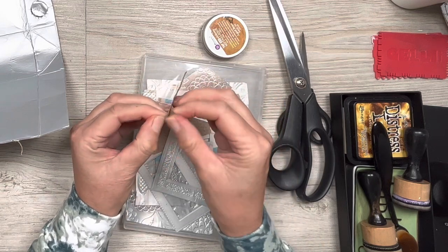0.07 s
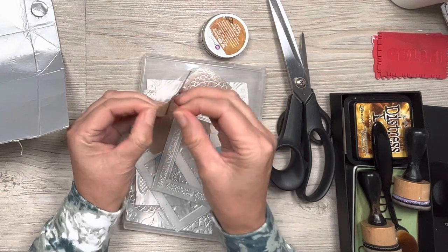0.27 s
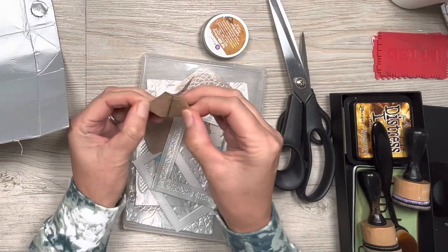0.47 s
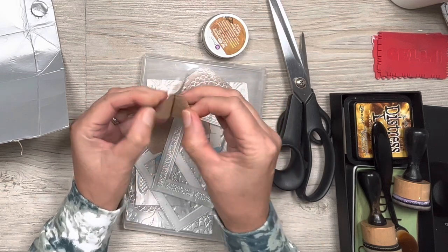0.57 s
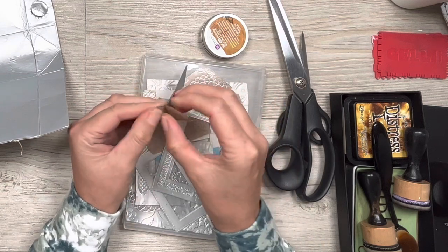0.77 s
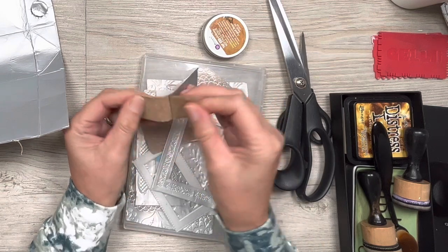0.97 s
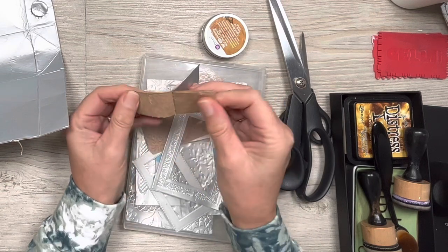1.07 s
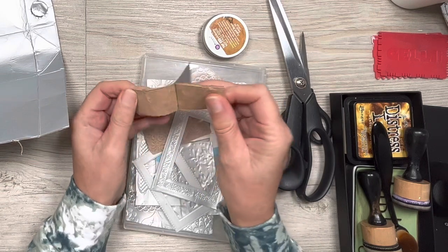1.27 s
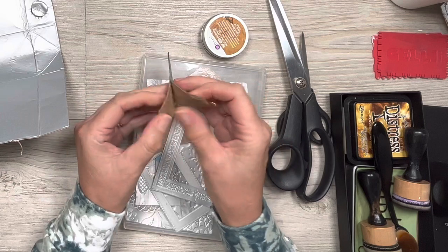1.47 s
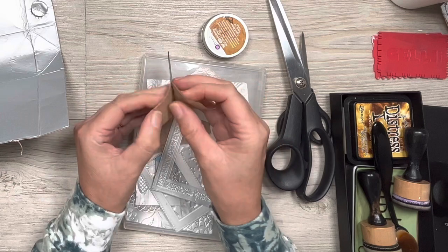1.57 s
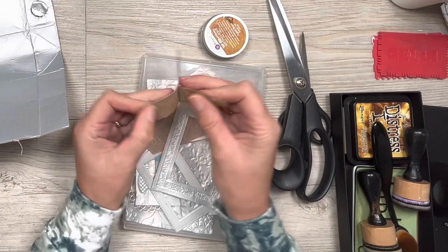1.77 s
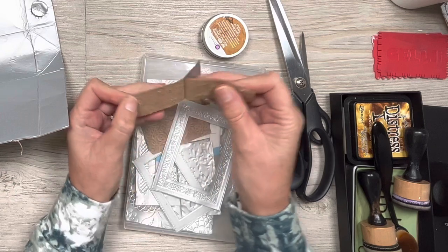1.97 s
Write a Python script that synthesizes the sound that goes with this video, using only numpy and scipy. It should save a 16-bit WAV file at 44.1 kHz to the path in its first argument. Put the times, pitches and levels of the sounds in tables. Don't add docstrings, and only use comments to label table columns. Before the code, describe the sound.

Hands peel a small piece of cardboard apart in three short, crackling rips, with faint finger scuffs and ticks between; a quiet small room with low rumble, heard close on a phone's stereo microphones.

```python
import sys
import numpy as np
from scipy import signal
from scipy.fft import rfft, irfft
from scipy.io import wavfile
from scipy.ndimage import uniform_filter1d

SR = 44100
rng = np.random.default_rng(int(sys.argv[2]) if len(sys.argv) > 2 else 0)


def convert_level_to_amplitude(level_db):
    exponent = np.asarray(level_db, float) / 20
    return 10 ** exponent


def transcribe(u):
    v = np.clip(np.atleast_2d(u).T, -1, 1)
    q = np.round(v * 32767).astype(np.int16)
    wavfile.write(sys.argv[1], SR, q)


N = 88861

# (time [s], pull [dB], flap resonance [dB], brightness [dB])
RIPS = [
    [(0.145, -66, 21, -3), (0.149, -60, -52, -6.5), (0.181, -49.5, -33, -1), (0.225, -46.5, -19, 3),
     (0.363, -40, -19.5, -1.5), (0.433, -60.5, -17, -6), (0.46, -60.5, 12, -22)],
    [(0.845, -61, -11, -2), (0.859, -48, -70, 3.5), (0.875, -46, -21, 0), (0.915, -36.5, -42, -1.5),
     (0.999, -42.5, -5.5, 0.5), (1.095, -51, -18, -1), (1.113, -47, -5.5, 2), (1.173, -45.5, -12.5, 1.5),
     (1.25, -79, -17, -1)],
    [(1.735, -68, -11, 0), (1.763, -60.5, -11.5, -1), (1.775, -48, -29, 2), (1.829, -45, -27.5, -5),
     (1.937, -38, -13.5, 2), (1.957, -44, -4, 6.5), (1.969, -48.5, -10.5, 7.5), (2.015, -54.5, -19, 8)],
]
# (frequency [Hz], level [dB])
FIBRE_COLOUR = [(300, -24.5), (700, -20.5), (1400, -11), (3000, -7), (5500, 0.5), (8500, -1), (12000, 2),
                (15400, 1)]
FLAP_TOP_DB, FLAP_PULL_DB = -4, -50


def rips():
    t = np.arange(N) / SR
    snaps = fibres(per_s=5700, spread_db=1.5, clump_db=0.95, hiss=0.53)
    tear = evened(card(snaps, FIBRE_COLOUR, ring_db=-7.5))
    flap = loose_flap(snaps, hz=893, width_hz=233)
    out = 0
    for rip in RIPS:
        s, pull_db, flap_db, bright_db = np.transpose(rip)
        level = convert_level_to_amplitude(np.interp(t, s, pull_db, -150, -150) + 4.5)
        flap_limit_db = FLAP_TOP_DB + (np.interp(t, s, pull_db) - FLAP_PULL_DB) / 2
        shake = convert_level_to_amplitude(np.minimum(np.interp(t, s, flap_db), flap_limit_db) - 4.5)
        out = out + level * (tilt(tear, np.interp(t, s, bright_db)) + shake * flap)
    return out


# (time [s], level [dB])
GRIP = [(0, -68.5), (.13, -89), (.3, -67), (.5, -75), (.58, -70), (.7, -68), (.77, -68.5), (.84, -65.5),
        (1.27, -75.5), (1.32, -70.5), (1.37, -68), (1.44, -66), (1.53, -73), (1.58, -67), (1.67, -74),
        (1.72, -72.5), (1.76, -60), (2.02, -74)]
# (start [s], length [s], level [dB], brightness [dB], flap resonance [dB])
SCUFFS = [(0.028, 0.017, -64, -2.5, -61), (0.077, 0.045, -77, -21, -7), (0.514, 0.038, -58, -2, -11),
          (0.641, 0.017, -67, -3.5, -22), (0.774, 0.037, -63.5, 3, -13), (1.291, 0.0045, -84.5, 14, -48),
          (1.334, 0.018, -61, -7, -20), (1.37, 0.0098, -71, 3, -31), (1.386, 0.013, -60, 3, -22),
          (1.407, 0.0048, -73, 9, -7), (1.487, 0.0092, -74, -10, -8.5), (1.556, 0.018, -80.5, 10, -12),
          (1.631, 0.025, -83, 15, -42), (1.66, 0.023, -86.5, 10, -11)]
SCUFF_RISE, SCUFF_RELEASE_S = 0.34, 0.005
# (time [s], peak level [dB], brightness [dB])
SNAPS = [(0.527, -41, 1), (.8575, -38.5, 8), (1.1075, -30.5, 20), (1.2955, -78, 1), (1.337, -45.5, -11),
         (1.503, -54, -39), (1.781, -42, 6), (.169, -43, 9), (1.8767, -28.5, -3.5), (1.961, -34, 3),
         (1.241, -51, -14)]
# (frequency [Hz], level [dB])
SKIN_COLOUR = [(300, -24), (1000, -16.5), (1700, -3.5), (4400, -5.5), (6500, -1), (8000, -6.5), (11000, -6),
               (15000, -10.5)]


def fingers():
    t = np.arange(N) / SR
    grains = fibres(per_s=4000, spread_db=2.5, clump_db=0.8, hiss=1.5)
    rub = evened(card(grains, SKIN_COLOUR, ring_db=1))
    flap = loose_flap(grains, hz=900, width_hz=400)
    out = convert_level_to_amplitude(np.interp(t, *np.transpose(GRIP)) + 2) * (rub + convert_level_to_amplitude(-17.5) * flap)
    for start, length, db, bright_db, flap_db in SCUFFS:
        rise = np.clip((t - start) / (SCUFF_RISE * length), 0, 1)
        shape = rise * np.exp(-np.maximum(t - start - length, 0) / SCUFF_RELEASE_S)
        out = out + convert_level_to_amplitude(db + 4.5) * shape * (tilt(rub, bright_db) + convert_level_to_amplitude(flap_db) * flap)
    for s, db, bright_db in SNAPS:
        out = out + convert_level_to_amplitude(db) * snap(t - s, bright_db)
    return out


def snap(since, bright_db):
    burst = rng.standard_normal(N) * (since >= 0) * np.exp(-np.maximum(since, 0) / 0.0012)
    tick = tilt(signal.oaconvolve(burst, colour(SKIN_COLOUR))[:N], bright_db)
    tick = tick + convert_level_to_amplitude(-4) * ring(burst, SHEET_MODES[:3] + SHEET_MODES[5:6])
    tick = tick + convert_level_to_amplitude(-10) * ring(burst, FLAP_MODES[:3])
    return tick / abs(tick).max()


def fibres(per_s, spread_db, clump_db, hiss):
    draw, fine = rng.random(N), rng.standard_normal(N)
    size = np.minimum(rng.exponential(1, N), 4)
    snaps = convert_level_to_amplitude(spread_db * size) * np.sign(fine) * (draw < per_s / SR)
    clumps = convert_level_to_amplitude(clump_db * (drift(size=60) + drift(size=400)))
    return evened((evened(snaps) + hiss * fine) * clumps)


# (frequency [Hz], width [Hz], level [dB])
SHEET_MODES = [(2315, 79, -28.5), (2997, 170, 0.5), (4417, 540, 2), (5630, 710, 4), (6195, 74, 5),
               (7050, 164, -0.5), (9760, 100, -15.5), (14430, 390, 7)]


def card(x, spectrum, ring_db):
    body = signal.oaconvolve(x, colour(spectrum))[:N]
    rings = sum(convert_level_to_amplitude(2.64 * drift(size=1500)) * ring(body, [mode]) for mode in SHEET_MODES)
    return body + convert_level_to_amplitude(ring_db) * rings


# (frequency [Hz], width [Hz], level [dB])
FLAP_MODES = [(757, 173, -7.5), (956, 300, -0.5), (1178, 145, 3.5), (435, 113, 4)]


def loose_flap(x, hz, width_hz):
    return evened(ring(ring(x, FLAP_MODES), [(hz, width_hz, 0)]))


# (frequency [Hz], T60 [s])
ROOM_DECAY = [(500, 0.24), (3000, 0.15), (8000, 0.081), (15000, .12)]


def room(x, wet_db):
    taps = np.zeros(SR // 2)
    at = np.arange(20, len(taps) - 20, 20)
    taps[at + rng.integers(0, 20, len(at))] = rng.choice([-1., 1.], len(at))
    hz, t, z = signal.stft(taps, SR, nperseg=256)
    t60 = np.interp(hz, *np.transpose(ROOM_DECAY))[:, None]
    tail = signal.istft(z * convert_level_to_amplitude(-60 * t / t60), SR, nperseg=256)[1]
    return x + convert_level_to_amplitude(wet_db) * signal.fftconvolve(x, tail / np.linalg.norm(tail))[:N]


# (frequency [Hz], level [dB])
RUMBLE_COLOUR = [(25, -24), (57, 0), (85, -9), (190, -19), (330, -21), (650, -31), (1850, -31), (3250, -44)]
# (start [s], length [s], level [dB], pitch [Hz])
BUMPS = [
    (0.133, 0.12, -81, 54.5),
    (1.712, 0.031, -76, 155),
    (1.897, 0.12, -66.5, 130),
]


def rumble():
    hz, t = np.fft.rfftfreq(N, 1 / SR), np.arange(N) / SR
    f, db = np.transpose(RUMBLE_COLOUR)
    gain = convert_level_to_amplitude(np.interp(np.log(hz + 1), np.log(f), db, -60, -60))
    out = convert_level_to_amplitude(-76) * evened(irfft(rfft(rng.standard_normal(N)) * gain, N))
    for s, length, db, pitch in BUMPS:
        low = ring(ring(rng.standard_normal(N), [(pitch, pitch, 0)]), [(pitch, 2 * pitch, 0)])
        out = out + convert_level_to_amplitude(db) * evened(low) * np.sin(np.pi * np.clip((t - s) / length, 0, 1))
    return out


# (frequency [Hz], lag of the right [half turns], likeness [0-1], left over right [dB])
PORTS = [(40, 0, .97, 0), (130, 0, .5, 1), (350, -.7, .5, 4), (600, .1, .65, 3), (1200, -.25, .7, 2),
         (3200, .8, .3, -1), (4600, .6, .15, -4), (5450, 1, .92, 0), (7850, 2, .8, 0), (15150, 5, .87, 0)]
WANDER_TURNS = 0.07
PATCH_DB = 2.2


def two_ports(near, other):
    hz, _, (a, b) = signal.stft([near, other], SR, nperseg=512, noverlap=384)
    port_hz, *columns = np.transpose(PORTS)
    lag, like, pan_db = (np.interp(hz, port_hz, v)[:, None] for v in columns)
    treble = np.minimum(hz / 2000, 1)[:, None]
    wander = WANDER_TURNS * treble * drift_map(a.shape, frames=16, bins=24)
    patch = convert_level_to_amplitude(PATCH_DB * treble * drift_map(a.shape, frames=14, bins=9))
    a, b = a * patch, b * patch
    right = (like * a + np.sqrt(1 - like ** 2) * b) * np.exp(-1j * np.pi * (lag + wander))
    pair = [a * convert_level_to_amplitude(pan_db / 2), right * convert_level_to_amplitude(-pan_db / 2)]
    return signal.istft(pair, SR, nperseg=512, noverlap=384)[1][:, :N]


def evened(x):
    return x / np.sqrt(np.mean(x ** 2) + 1e-20)


def drift(size):
    return evened(uniform_filter1d(uniform_filter1d(rng.standard_normal(N), size), size))


def drift_map(shape, frames, bins):
    noise = uniform_filter1d(rng.standard_normal(shape), size=frames, axis=1)
    return evened(uniform_filter1d(noise, size=bins, axis=0))


def colour(points):
    hz = abs(np.fft.fftfreq(2048, 1 / SR))
    f, db = np.transpose(points)
    log = np.log(convert_level_to_amplitude(np.interp(np.log(hz + 1), np.log(f), db)))
    return np.fft.ifft(np.exp(np.conj(signal.hilbert(log)))).real[:1024]


def ring(x, modes):
    out = 0
    for hz, width, db in modes:
        r = np.exp(-np.pi * width / SR)
        poles = [1, -2 * r * np.cos(2 * np.pi * hz / SR), r * r]
        out = out + convert_level_to_amplitude(db) * signal.lfilter([1 - r, 0, r - 1], poles, x)
    return out


def tilt(x, bright_db):
    low = signal.sosfilt(signal.butter(2, 6500, fs=SR, output="sos"), x)
    return low + convert_level_to_amplitude(bright_db) * (x - low)


def scene():
    dry = rips() + fingers()
    near = room(dry, wet_db=-19.5) + rumble()
    other_db = 12
    other = room(dry, other_db) / np.hypot(1, convert_level_to_amplitude(other_db)) + rumble()
    return two_ports(near, other)


def top_cut(x):
    return signal.sosfilt(signal.butter(12, 15710, fs=SR, output="sos"), x)


def record(dry):
    weak_db, weak_from_hz = -5.5, 2400
    hz, _, z = signal.stft([dry[0] + dry[1], dry[0] - dry[1]], SR, nperseg=1024)
    edges = np.arange(0, len(hz), 8)
    band_hz = hz[edges, None]
    power = uniform_filter1d(np.add.reduceat(abs(z) ** 2, edges, 1), size=5, axis=2)
    limit_db = weak_db - 2 * (band_hz < 6500)
    keep = (power > convert_level_to_amplitude(2 * limit_db) * power[::-1]) | (band_hz < weak_from_hz)
    kept = z * np.repeat(keep, 8, 1)[:, :len(hz)]
    mid, side = signal.istft(kept, SR, nperseg=1024)[1][:, :N] / 2
    return top_cut(np.array([mid + side, mid - side]))


dry = scene()
out = record(dry)
transcribe(out)
```